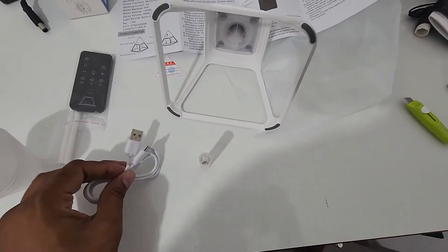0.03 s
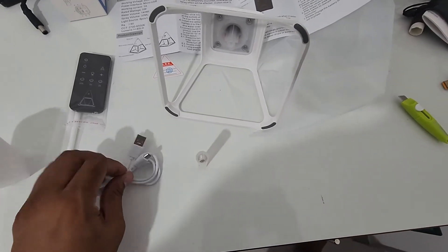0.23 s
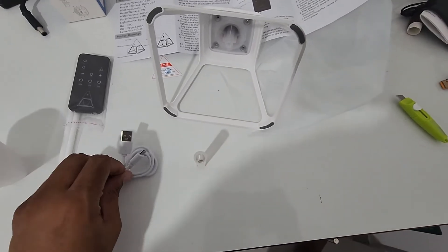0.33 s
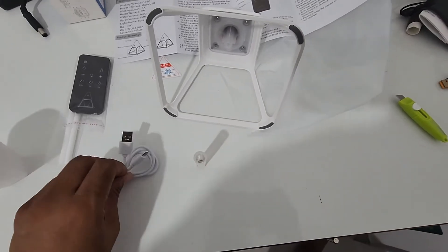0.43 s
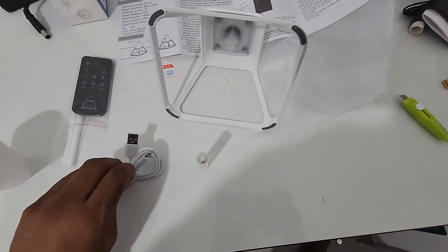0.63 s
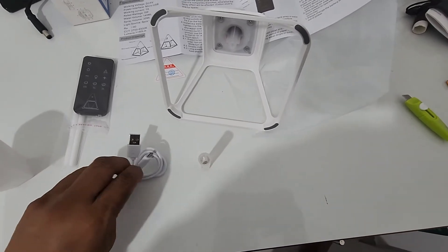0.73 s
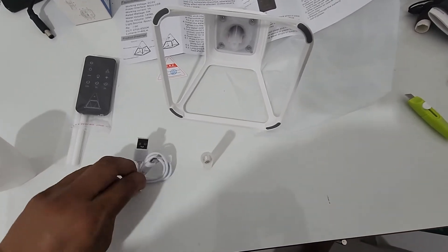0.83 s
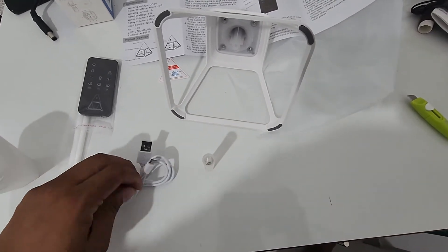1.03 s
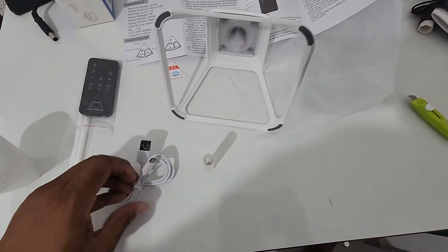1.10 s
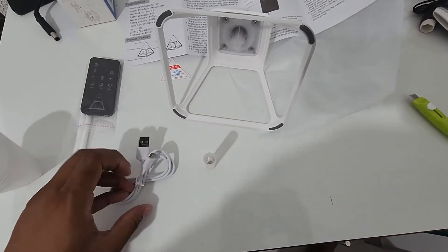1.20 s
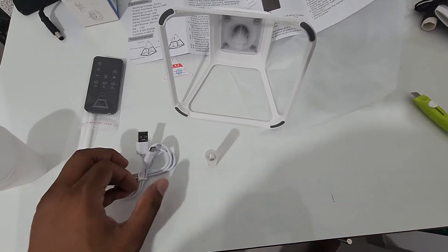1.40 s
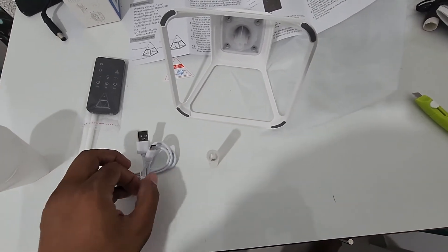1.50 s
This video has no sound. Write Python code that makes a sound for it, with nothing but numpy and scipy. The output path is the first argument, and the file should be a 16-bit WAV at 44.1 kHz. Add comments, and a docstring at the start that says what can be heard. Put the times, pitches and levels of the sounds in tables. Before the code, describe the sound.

A quick double knock sounds as a hand lays a cable on a table, just after a light plug tick. Soft thuds and a faint sliding rustle follow, close to the microphone in a quiet room.

```python
"""A hand sets a coiled cable down on a table, close to a stereo microphone in a small quiet room.
Fingers brush the top and the plug ticks, then the hand lands with a quick double knock that rings the
table's modes. The coil slides, bumps dully and rustles under the fingers.
Behind it lie a low rumble, faint room air and a thin electrical whine."""
import sys
import numpy as np
from scipy import signal
from scipy.fft import rfft, irfft, next_fast_len
from scipy.io import wavfile
from scipy.ndimage import map_coordinates

SR = 44100
rng = np.random.default_rng(int(sys.argv[2]) if len(sys.argv) > 2 else 0)


def transcribe(u):
    """Save the signal u as a 16-bit wav file named by the first command-line argument.

    u: samples, shape (n,) or (channels, n), limited to [-1, 1]; the rate is SR.
    q: integer samples, one column per channel.
    """
    v = np.clip(np.atleast_2d(u).T, -1, 1)
    q = np.round(v * 32767).astype(np.int16)
    wavfile.write(sys.argv[1], SR, q)


N = 68355
T = np.arange(N) / SR

# knocks on the table: start_s, ring_db, clatter_db, crack_db, treble_limit_hz
KNOCK_HITS = [(0.2116, -33, -30, -40, 1170), (0.2266, -31, -29, -32, 3280), (0.2348, -40, -36.5, -59, 2360)]
# main modes of the table: pitch_hz, level_db, t60_s, left_over_right_db, rise_s
TABLE_MODES = [(113.5, 9, 0.26, 3, 0.093), (155.45, -6, 0.46, -3, 0.016), (297, -6, 0.32, 4.5, 0.017),
               (416.5, -0.5, 0.47, 3, 0.023), (453, 1, 0.42, 1, 0.038), (622.5, 3, 0.41, 8, 0.00058),
               (659.7, 4, 0.52, 4, 0.00087), (743, -10, 0.34, -19, 0.0062), (833, -4.5, 0.3, -3, 0.0021),
               (889.5, 1.5, 0.31, -10, 0.0038), (963, 0, 0.19, -1.5, 0.0024), (996, 2.5, 0.34, -2, 0.012),
               (1170, -1.5, .27, -6, 0.004), (1222, 4.5, 0.16, 5, 0.0054), (1408, -12, 0.53, 3.5, 0.0046),
               (1695, 7, 0.17, -1, .004), (2204, -1.5, 0.077, -15.5, 0.0044),
               (2344, -4.5, 0.74, 1.5, 0.0017), (3030, -9, 0.41, -4.5, .003), (3480, -15, 0.57, -2, .003)]
# the table's dense weaker modes: frequency_hz, density_db
CLATTER_SPECTRUM = [(40, -31), (150, -3), (340, -2), (520, -2), (620, 3.5), (800, -1), (1300, -0.5),
                    (2250, -8.5), (2650, -21.5), (3050, -11), (3500, -18.5), (4000, -23.5), (8000, -27.5),
                    (15500, -27.5)]
# their decay: frequency_hz, t60_s
CLATTER_DECAY = [(150, 0.77), (650, 0.65), (1200, 0.5), (2000, 0.48), (4000, 0.4), (12000, 0.25)]
# hard contact of the plug: frequency_hz, density_db
CRACK_SPECTRUM = [(200, -22), (900, 4), (2200, 12), (3800, 0), (4800, 5.5), (6200, -5), (8000, -3),
                  (15500, -14)]
# where clatter and crack sit at the microphone: frequency_hz, left_over_right_db
KNOCK_BALANCE = [(200, 0.5), (650, -1), (1300, -2), (2300, -8), (3200, -7), (5000, 4.5), (9000, 13),
                 (14000, -1)]
# ticks of plug and cable: start_s, level_db, t60_s
TICK_HITS = [(0.0781, -65.5, 0.3), (0.1231, -37.5, 0.016), (0.136, -50, 0.01), (0.3366, -56, 0.011),
             (0.693, -59.5, 0.011)]
# colour of a tick: frequency_hz, density_db
TICK_SPECTRUM = [(300, -20), (1200, -14), (2400, -2), (3300, 6), (4100, 2), (5100, 6), (6200, 1), (7600, 8),
                 (9000, 0), (15500, -1)]
# soft finger touches on the table: start_s, level_db
FINGER_TOUCHES = [(0.085, -43.5), (0.149, -40)]
# low thuds of the hand: start_s, level_db, pitch_hz
HAND_THUDS = [(0.487, -43.5, 321.4), (0.546, -36.5, 85), (0.705, -40.5, 176.5), (0.886, -39, 96),
              (0.967, -36, 98), (1.214, -33.5, 91.3)]
# the coil sliding under the hand: time_s, level_db
SLIDE_LEVELS = [(.36, -90), (.5, -61), (.65, -61), (.72, -57), (.8, -59.5), (.92, -59.5), (1.12, -61),
                (1.3, -68), (1.55, -68)]
# dull resonances it rubs: frequency_hz, density_db
SLIDE_SPECTRUM = [(100, -25), (210, -17), (265, 1), (310, 1.5), (345, -7), (385, -1), (520, -11), (720, -4),
                  (900, -10), (1100, -18), (1500, -15), (2500, -24), (8000, -70)]
# fingertips on the cable: time_s, level_db
RUSTLE_LEVELS = [(0, -80.5), (.09, -74.5), (.2, -61), (.4, -72), (.62, -72.5), (.7, -66), (.79, -68.5),
                 (.88, -77), (1.0, -95), (1.1, -68), (1.15, -75), (1.2, -73), (1.27, -82), (1.34, -72),
                 (1.46, -82), (1.55, -88)]
# their hiss: frequency_hz, density_db
RUSTLE_SPECTRUM = [(1000, -10), (3000, 10), (4500, -5), (6000, -11.5), (8200, 2), (10500, -15), (14500, -5)]
# low rumble in the room: time_s, level_db
RUMBLE_LEVELS = [(0, -51.5), (.15, -51.5), (.6, -50), (.85, -55), (1.05, -49), (1.25, -52), (1.35, -54),
                 (1.55, -52.5)]
# its colour: frequency_hz, density_db
RUMBLE_SPECTRUM = [(20, 1), (35, -19.5), (52, 5), (75, 2), (105, 5.5), (135, -4.5), (210, -15), (400, -55)]
# room air: frequency_hz, density_db
AIR_SPECTRUM = [(100, -24), (200, -17), (300, -3), (380, 2.5), (520, -11.5), (780, -6.5), (1060, -18),
                (1650, -5.3), (3000, -7), (4600, -23.5), (6200, -31.5), (8200, -23), (10500, -41.5),
                (15500, -46)]
# likeness of left and right at the microphone: frequency_hz, correlation (clipped to -1..1)
STEREO_LIKENESS = [(60, 2.1), (170, .87), (350, 0.87), (700, 0.5), (1400, 0.3), (3000, 0.5), (12000, -0.2)]


def knocks():
    """Main source, close up: each knock cracks, clatters and rings the table; a soft one is duller."""
    impacts = np.zeros((2, N))
    for start_s, _, clatter_db, crack_db, limit_hz in KNOCK_HITS:
        body = filtered(clatter(), lambda hz: 1 / (1 + 1j * hz / limit_hz))
        impacts += at(start_s, amp(clatter_db) * body + amp(crack_db) * plug_crack())
    return table_ring() + filtered(impacts, lambda hz: pan(along(KNOCK_BALANCE, hz)))


def table_ring(drift_onset_s=0.015):
    """The main modes start together and drift apart; each knock adds energy, at once or slowly."""
    ring = np.zeros((2, N))
    age = T - KNOCK_HITS[0][0]
    for hz, db, t60, pan_db, rise_s in TABLE_MODES:
        swell = strike(t60, rise_s)[None]
        energy = sum(at(start_s, amp(ring_db) * swell) ** 2 / (1 + (hz / limit_hz) ** 4)
                     for start_s, ring_db, _, _, limit_hz in KNOCK_HITS)
        stereo_phase = np.array([[1.1], [-1.1]]) * np.tanh(hz / 1000)
        drift = waver() * np.tanh(age / drift_onset_s)
        tone = np.sin(2 * np.pi * hz * age + drift + stereo_phase)
        ring += amp(db) * pan(pan_db) * np.sqrt(energy) * tone
    return ring


def clatter():
    """Dense modes of table and room, each band dying at its own speed."""
    modes = unit(filtered(noise(CLATTER_SPECTRUM), mode_humps))
    hz, t, bands = signal.stft(modes, SR, nperseg=512)
    decay = fade(t, along(CLATTER_DECAY, hz)[:, None])
    tail = signal.istft(bands * decay, SR, nperseg=512)[1][:, :N]
    return tail * (1 - np.exp(-T / 0.000067))


def mode_humps(hz, width_hz=32, valley_db=-7, below_hz=1500):
    """The low clatter gathers around the main modes and leaves valleys between them."""
    nearness = np.max([np.exp(-((hz - mode[0]) / width_hz) ** 2) for mode in TABLE_MODES], axis=0)
    return amp(valley_db * (1 - nearness) / (1 + (hz / below_hz) ** 8))


def plug_crack(ripple_hz=160, ripple_db=8.5):
    """Hard contact: a noise burst through the plug's many small treble resonances."""
    burst = noise(CRACK_SPECTRUM)
    knots = rng.standard_normal(size=2048)
    ripple = lambda hz: amp(ripple_db * np.tanh(hz / 2000) * map_coordinates(knots, [hz / ripple_hz]))
    return unit(filtered(burst, ripple)) * strike(t60=0.015, attack_s=0.00089)


def plug_ticks():
    """Bright snaps just left of centre; each wakes a hollow note in the plug and a faint room tail."""
    ticks = np.zeros((2, N))
    room_tail = amp(-22) * strike(t60=0.45, attack_s=0.0014)
    for start_s, db, t60 in TICK_HITS:
        snap = noise(TICK_SPECTRUM) * (strike(t60, attack_s=0.00039) + room_tail)
        hollow = amp(-8) * band(centre_hz=1600, width_hz=450) * strike(t60=0.03, attack_s=0.0017)
        ticks += at(start_s, amp(db) * (snap + hollow))
    return pan(1.5) * ticks


def finger_touches():
    """Soft touches wake one low resonance of the table, with a dull scuff of skin."""
    envelope = strike(t60=0.32, attack_s=0.008)
    return sum(at(start_s, amp(db) * (low_tone(hz=429) + amp(-9.5) * noise(SLIDE_SPECTRUM)) * envelope)
               for start_s, db in FINGER_TOUCHES)


def hand_thuds():
    """The hand bumps the table softly: only the low end answers."""
    envelope = strike(t60=0.21, attack_s=0.015)
    return sum(at(start_s, amp(db) * low_tone(hz) * envelope) for start_s, db, hz in HAND_THUDS)


def coil_slide():
    """The coil slides under the hand and rubs the table's dull resonances."""
    return fader(SLIDE_LEVELS) * noise(SLIDE_SPECTRUM)


def cable_rustle(grains_per_s=640, grain_db=1):
    """Fingertips shift on the cable: a fine, grainy hiss."""
    grains = unit(amp(grain_db * map_coordinates(rng.standard_normal(size=4096), [T * grains_per_s])))
    return fader(RUSTLE_LEVELS) * grains * noise(RUSTLE_SPECTRUM)


def room_tone():
    """Background: a slowly shifting rumble under steady air and a thin electrical whine."""
    whine = amp(-88.5) * band(centre_hz=7760, width_hz=130)
    rumble = fader(RUMBLE_LEVELS) * noise(RUMBLE_SPECTRUM)
    air = amp(-64) * noise(AIR_SPECTRUM)
    return rumble + air + whine


def low_tone(hz):
    """One wavering table resonance, centred."""
    return np.ones((2, 1)) * np.sin(2 * np.pi * hz * T + waver())


def waver(depth_rad=0.52, turns_per_s=43.97):
    """A random wander of phase."""
    return depth_rad * map_coordinates(rng.standard_normal(size=256), [T * turns_per_s])


def noise(spectrum):
    """Coloured stereo noise of rms 1, near mono in the bass."""
    angle = lambda hz: np.arccos(np.clip(along(STEREO_LIKENESS, hz), -1, 1)) / 2
    response = lambda hz: amp(along(spectrum, hz)) * [np.cos(angle(hz)), np.sin(angle(hz))]
    mid, side = filtered(rng.standard_normal((2, N)), response)
    return unit(np.array([mid + side, mid - side]))


def band(centre_hz, width_hz):
    """Narrow stereo noise of rms 1."""
    bell = lambda hz: np.exp(-((hz - centre_hz) / width_hz) ** 2)
    return unit(filtered(rng.standard_normal((2, N)), bell))


def filtered(x, response):
    """x times a response of frequency."""
    size = next_fast_len(N + SR // 2)
    return irfft(rfft(x, size) * response(np.fft.rfftfreq(size, 1 / SR)), size)[..., :N]


def strike(t60, attack_s):
    """Envelope of a blow: rise, then decay."""
    return fade(T, t60) * (1 - np.exp(-T / attack_s))


def fade(t, t60):
    """Exponential decay by 60 dB in t60 seconds."""
    return np.exp(-np.log(1000) * t / np.maximum(t60, 1e-3))


def fader(levels):
    """Gain through (time_s, level_db) points."""
    return amp(np.interp(T, *np.transpose(levels)))


def along(points, hz):
    """(frequency_hz, value) points read on a log axis."""
    frequencies, values = np.transpose(points)
    return np.interp(np.log(hz + 1), np.log(frequencies + 1), values)


def at(start_s, x):
    """x delayed to start_s."""
    return np.pad(x, ((0, 0), (max(round(start_s * SR), 0), 0)))[:, :N]


def pan(db):
    """Left and right gains for a level difference."""
    return amp(np.array([[.5], [-.5]]) * db)


def amp(db):
    """Decibels to gain."""
    return 10 ** (np.asarray(db) / 20)


def unit(x):
    """Scaled to rms 1."""
    return x / np.sqrt(np.mean(x ** 2) + 1e-20)


def scene():
    """The table close to the microphone, the room behind it."""
    contacts = knocks() + plug_ticks() + finger_touches() + hand_thuds()
    return contacts + coil_slide() + cable_rustle() + room_tone()


def record(dry):
    """The microphone signal, with nothing above 15950 Hz."""
    return filtered(dry, lambda hz: hz < 15950)


dry = scene()
out = record(dry)
transcribe(out)
```